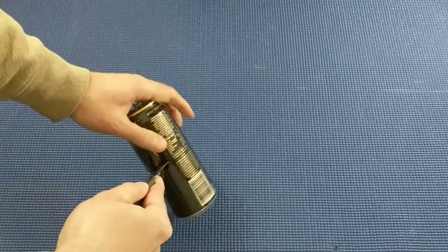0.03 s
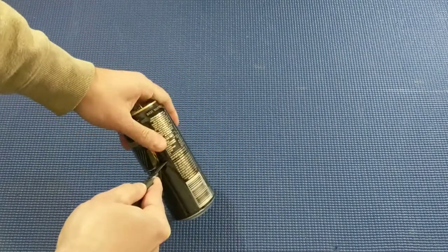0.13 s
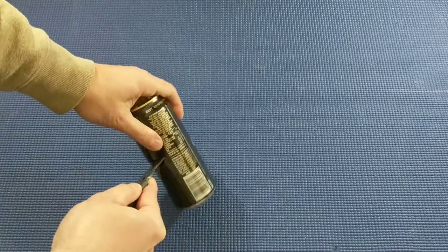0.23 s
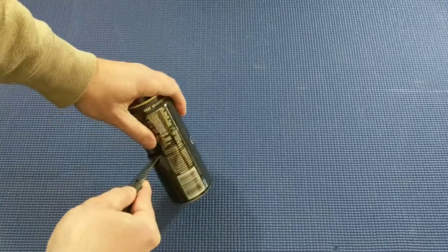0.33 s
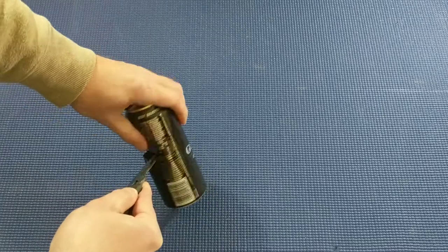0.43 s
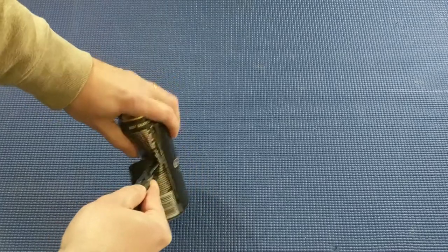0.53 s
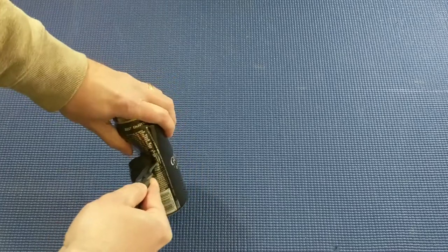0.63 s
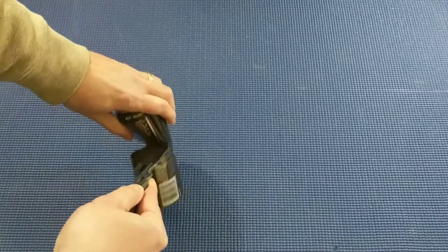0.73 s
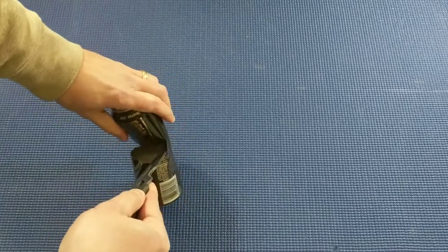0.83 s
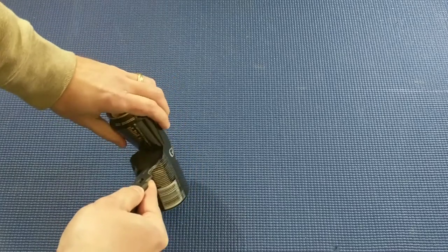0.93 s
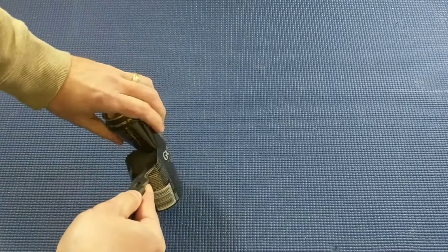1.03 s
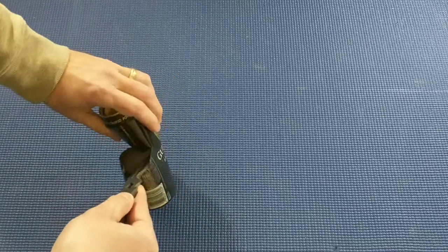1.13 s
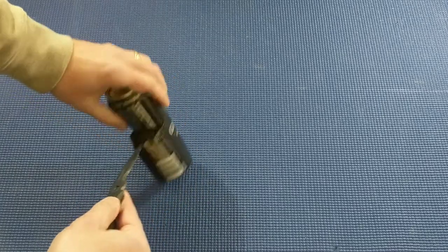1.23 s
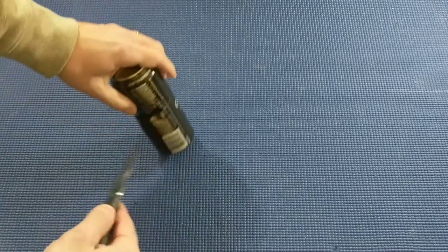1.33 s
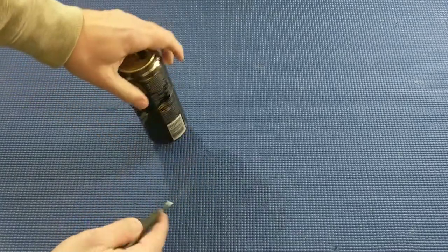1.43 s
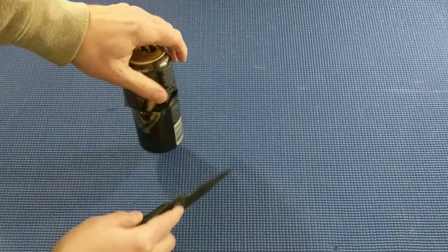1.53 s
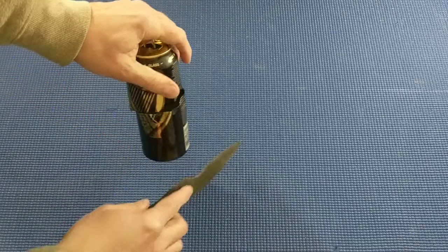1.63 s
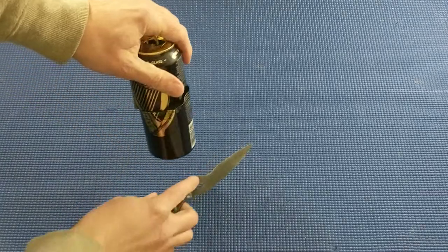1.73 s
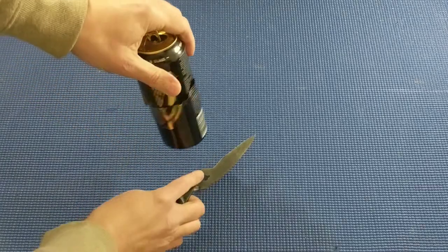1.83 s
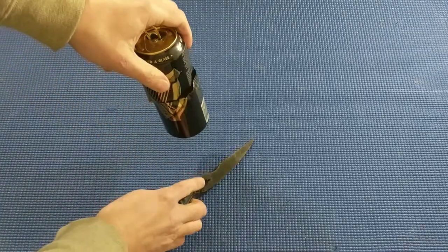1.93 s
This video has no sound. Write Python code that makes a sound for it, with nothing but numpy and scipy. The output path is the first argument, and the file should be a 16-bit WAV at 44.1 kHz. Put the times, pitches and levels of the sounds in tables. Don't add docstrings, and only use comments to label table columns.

```python
import sys
import numpy as np
from scipy import signal
from scipy.fft import rfft, irfft
from scipy.io import wavfile
from scipy.ndimage import uniform_filter1d

SR = 44100
rng = np.random.default_rng(int(sys.argv[2]) if len(sys.argv) > 2 else 0)


def log_audio(samples):
    frames = np.atleast_2d(samples).T
    limited = np.clip(frames, -1, 1)
    pcm = np.round(limited * 32767).astype(np.int16)
    wavfile.write(sys.argv[1], SR, pcm)


def boost(x):
    u = np.asarray(x, float) / 20
    return 10 ** u


N = 85995

# (frequency [Hz], density [dB per Hz])
HUSH_SPECTRUM = [(26, -31), (45, -5.5), (273, -9), (416, -13), (532, -15), (2340, -20.5), (3390, -22),
                 (14600, -36.5), (16500, -32.5)]
HUSH_DB, HUSH_DRIFT_DB = -66.5, 1.66
WHINE_HZ, WHINE_DB = 9250, -89
ROOM_DB, ROOM_T60_S = -9, .11
GRIP_DB, GRIP_FROM_S = -40, 0.59
# (time [s], level [dB], frequency [Hz])
THUMPS = [(.16, -64.5, 75), (.33, -56, 81), (.515, -56, 168), (0.654, -51, 70), (0.774, -46.5, 87.5),
          (.85, -52.5, 79.5), (.978, -54, 161), (1.324, -51, 74.4), (1.424, -56.5, 200.5)]
THUMP_PEAK_S = 0.013
# (time [s], level [dB], frequency [Hz])
LIP_CURVE = [(.04, -72, 1230), (.075, -51, 1230), (.125, -71, 1230), (.83, -77, 1140), (0.867, -31.5, 1123),
             (.885, -39, 1120), (.905, -43, 1144), (.95, -45.5, 1130), (1.0, -41, 1140),
             (1.04, -33.5, 1130), (1.062, -38, 1150), (1.078, -41, 1120), (1.12, -57, 1140),
             (1.16, -43, 1146), (1.21, -65, 1090), (1.272, -31.5, 1130), (1.3, -62, 1152)]
LIP_WIDTH_HZ = 55
# (time [s], peak level [dB], frequency [Hz], t60 [s])
PATCHES = [(0.048, -26.5, 2490, 0.041), (.047, -26.5, 3344, 0.046), (0.064, -32, 3265, 0.038),
           (0.545, -33, 3100, 0.054), (0.623, -20, 2550, 0.034), (0.756, -27, 1470, 0.059),
           (.798, -24, 846, 0.12), (1.092, -36, 1816, 0.052), (1.155, -29.5, 872, 0.056),
           (1.266, -20, 3316, 0.034), (1.271, -16, 2700, 0.029), (1.28, -16.5, 822, 0.073),
           (1.314, -4, 5020, 0.017), (1.316, -18.5, 1782, 0.081), (1.329, -22.5, 814, .04),
           (1.338, -16, 4500, 0.026), (1.4224, -46, 2400, 0.053), (1.4253, -47, 2745, 0.051)]
PATCH_RISE_S = 0.0027
# (time [s], peak level [dB], centre [Hz], ring t60 [s], crack level [dB])
SNAPS = [(0.038, -23, 4620, 0.021, 7.5), (0.2337, -15, 4150, 0.0058, 12.5), (.2652, -6.5, 5200, .04, 6),
         (0.4668, -17.5, 9480, 0.029, 10), (0.5467, -19, 2990, 0.06, 7), (0.583, -19.5, 2980, 0.024, 0),
         (0.7645, -12, 5140, 0.008, 3.5), (0.7858, -11, 4880, 0.0066, 2), (0.9593, -25.5, 2950, 0.095, 4),
         (1.0898, -27.5, 3140, 0.029, 5.5), (1.139, -31, 3250, 0.04, -9), (1.267, -24.5, 2930, 0.076, 7.5),
         (1.314, -22, 5160, 0.05, -11), (1.34, -15, 4590, 0.017, -20), (1.4223, -39.5, 3140, 0.033, 3),
         (1.51, -54, 8410, 0.023, -4)]
# (time [s], peak level [dB], centre [Hz], ring t60 [s], crack level [dB])
BUCKLES = [
    (.2287, -8, 1800, .008, -4),
    (.5455, -15, 1390, .04, -13),
    (.657, -27, 640, .05, -12),
    (.986, -14, 1440, .03, -15),
    (1.090, -26, 1130, .05, -15),
    (1.4235, -30, 670, .14, -18),
    (1.4225, -35, 470, .05, -12),
    (1.4225, -33, 1500, .05, -8),
    (1.772, -49, 1040, .08, -15),
]
POP_OCTAVES, POP_SKIRT_DB, POP_RISE_S = .5, -20, 0.00033
CRACK_WIDTH_RATIO, CRACK_DECAY_S = .85, .003
# (frequency [Hz], level [dB], t60 [s])
PING_MODES = [(1477, -13.5, 0.031), (1758, -7.5, 0.061), (2715, -12.5, 0.059), (3210, -7.5, 0.095)]
PING_S, PING_DB = .2333, -5
# (start [s], length [s], level [dB], fade over the run [dB])
RIPS = [(.2866, .009, -2, -3), (.2965, .017, 0, -6), (.3148, .010, 0, -6), (.3261, .007, -1, -4),
        (.3348, .0045, -2, 3), (.3416, .015, -1, 0), (.3585, .005, -3, 2), (.369, .004, 0, -3)]
SLIPS_PER_S, SLIP_JITTER, SLIP_SPREAD_DB = 712, .04, 2.0
TICK_HZ, TICK_WIDTH_HZ = 3500, 3000
# (frequency [Hz], width [Hz], level [dB])
TEAR_MODES = [(1413, 41, -19.5), (2097, 51, -16), (2820, 58, -10), (3250, 88, -9), (3640, 49, -20),
              (4570, 64, 3.5), (8830, 190, -4.5)]
TEAR_RING_DB, CROWD_DB, CROWD_T60_S = -17, -24, .035
# (time [s], rub level [dB], hollow share [dB], cavity [Hz])
PUSHES = [
    [(0, -59.5, -12, 560), (.033, -66.5, 13, 570), (.04, -31.5, -17, 510), (.063, -31, -10, 524),
     (.1, -83, 18, 595), (.125, -57, -5, 530), (.142, -51, -1, 530), (.2, -71, 7, 617)],
    [(.2, -69, -14, 520), (.214, -37, -12, 495), (.226, -53, -5, 501), (.28, -23.5, -22, 640),
     (.35, -22, -11.5, 657), (.372, -22, -4, 1160), (.4, -52, 10, 1170), (.455, -54, -1, 570)],
    [(.466, -36, -17, 640), (.49, -40, 0, 653), (.508, -44, 4, 626), (.52, -25.5, -3, 820),
     (.54, -39.5, 4, 660), (.585, -27, -3, 607), (.632, -32.5, -12, 630)],
    [(.632, -31.5, -38, 650), (.652, -38.5, -11, 700), (.662, -34.5, -5.5, 676), (.696, -52, 11, 690),
     (.706, -38.5, -19, 696), (.74, -58, 6, 690)],
]
# (time [s], rub level [dB], hollow share [dB], cavity [Hz])
PULLS = [
    [(.74, -58, 4, 660), (.754, -38.5, 6, 674), (.766, -25, -4.5, 713), (.805, -25.5, 3, 827),
     (.826, -37, 4, 770), (.844, -31.5, -7, 754), (.875, -45, -2, 820), (.895, -38.5, -6, 810),
     (.93, -42.5, -3, 780)],
    [(.93, -45, 2, 656), (.99, -28.5, 0.5, 803), (1.04, -36.5, 2, 830), (1.082, -57, 10.5, 850),
     (1.092, -37, 2, 880), (1.125, -75, 13, 850)],
    [(1.125, -66, 13, 885), (1.14, -42, -15, 840), (1.16, -43.5, 8, 808), (1.22, -70.5, 3.5, 890)],
    [(1.225, -52.5, -11, 970), (1.26, -33, -12, 860), (1.27, -24, -9, 847), (1.287, -31, -3, 786),
     (1.3, -28.5, -27, 900), (1.332, -22.5, -0.5, 745), (1.346, -37.5, -7, 774), (1.37, -64, 17, 756),
     (1.415, -72, 11, 705)],
    [(1.424, -50, -3, 676), (1.43, -41, -3, 697), (1.46, -67, 14.5, 640), (1.55, -74.5, -2, 608)],
    [(1.55, -77.5, -3, 606), (1.75, -77.5, 0, 882), (1.78, -74, 6, 1000), (1.94, -73.5, -9, 882)],
]
# (tilt above 2 kHz [dB per octave], shell level [dB])
STROKE_TONES = [(1.5, -6), (-3.5, -2), (-1.5, -0.5), (-5.5, 3.5), (-0.2, -6.5), (-2, 1.5), (-1.5, 2),
                (2.2, -2.5), (-3.5, -19.5), (-3, 5)]
# (frequency [Hz], density [dB per Hz])
RUB_SPECTRUM = [(150, -49.5), (250, -29.5), (809, -29.5), (1020, -8.5), (4350, -2.5), (5190, -7),
                (6290, -8), (15100, -13.5), (16600, -23.5)]
GRITS_PER_S, GRIT_SPREAD_DB, CLUMP_DB = 3500, 2.2, 3.5
CHIRPS_PER_S, CHIRP_DB, CHIRP_T60_S = 1000, -6.5, 0.018
WALL_T60_S, CAVITY_WIDTH_HZ = 0.07, 135
# (frequency [Hz], width [Hz], level [dB])
SHELL_MODES = [(365, 50, -13), (500, 55, -13), (640, 70, -9), (1400, 150, -11)]
SHELL_DB, THIN_HZ = -3.5, 340
DUCK_ABOVE_DB, DUCK_SHARE, RECOVER_DB_PER_S, EDGE_HZ = -30, .3, 35, 16000


def evened(x):
    return x / np.sqrt(np.mean(x ** 2) + 1e-20)


def add(mix, s, sound):
    part = mix[round(s * SR):][:len(sound)]
    part += sound[:len(part)]


def smooth_twice(x, size):
    return uniform_filter1d(uniform_filter1d(x, size), size)


def coloured(x, spectrum):
    f, db = np.transpose(spectrum)
    bins_hz = np.fft.rfftfreq(len(x), 1 / SR)
    gain_db = np.interp(np.log(bins_hz + 1), np.log(f + 1), db)
    return irfft(rfft(x) * boost(gain_db), len(x))


def resonate(x, hz, width_hz):
    turn = np.exp(2j * np.pi * np.cumsum(hz * np.ones(len(x))) / SR)
    r = np.exp(-np.pi * abs(width_hz) / SR)
    return 2 * (turn * signal.lfilter([1 - r], [1, -r], x / turn + 1e-18)).real


def ring(hz, db, t60_s, size=3500):
    t = np.arange(size)[:, None] / SR
    decay = boost(db - 60 * t / np.maximum(t60_s, .004))
    return (decay * np.sin(2 * np.pi * hz * t)).sum(1)


def rise(size, rise_s):
    return 1 - np.exp(-np.arange(size) / SR / rise_s)


def wall_modes(count=70):
    u = rng.random((count, 3))
    return 350 + 15000 * u[:, 0] ** 1.4, -14 * u[:, 1], .5 + u[:, 2]


def air():
    hush = evened(coloured(rng.standard_normal(N), HUSH_SPECTRUM))
    drift = evened(smooth_twice(rng.standard_normal(N), 2500))
    whine = evened(resonate(rng.standard_normal(N), WHINE_HZ, 30))
    return boost(HUSH_DB + HUSH_DRIFT_DB * drift) * hush + boost(WHINE_DB) * whine


def room(x):
    t = np.arange(SR // 3) / SR
    echoes = rng.standard_normal(len(t)) * (rng.random(len(t)) < .08)
    tail = echoes * (t > .003) * boost(-60 * t / ROOM_T60_S)
    return signal.oaconvolve(x, tail / np.linalg.norm(tail))[:N]


def grip(can):
    rumble = evened(resonate(resonate(rng.standard_normal(N), 140, 260), 170, 300))
    power = abs(uniform_filter1d(can ** 2, 1200))
    firmness = np.where(np.arange(N) > GRIP_FROM_S * SR, 1, .45)
    return boost(GRIP_DB) * rumble * np.minimum(power, .001) ** .3 * firmness


def thump(db, hz):
    t = np.arange(6000) / SR
    swell = t / THUMP_PEAK_S * np.exp(1 - t / THUMP_PEAK_S)
    return boost(db) * swell * np.sin(2 * np.pi * hz * t)


def lip():
    s, db, hz = np.transpose(LIP_CURVE)
    t = np.arange(N) / SR
    tone = evened(resonate(rng.standard_normal(N), np.interp(t, s, hz), LIP_WIDTH_HZ))
    return boost(np.interp(t, s, db, -120, -120)) * tone


def patch(db, hz, t60_s):
    pair = ring(hz * np.array([1, 1.035]), np.array([-2, -9]), t60_s)
    return boost(db) * pair * rise(len(pair), PATCH_RISE_S) * 1.5


def pop(db, hz, t60_s, crack_db):
    f, own_db, share = wall_modes()
    f = np.append(f, [hz, 0.65 * hz])
    own_db = np.append(own_db, [0, -5])
    share = np.append(share, [1.2, .8])
    octaves = np.log2(f / hz)
    near_db = POP_SKIRT_DB * (1 - np.exp(-(octaves / POP_OCTAVES) ** 2)) - 6 * np.maximum(octaves, 0)
    body = ring(f, own_db + near_db, t60_s * share)
    body = body * rise(len(body), POP_RISE_S)
    crack = rng.standard_normal(len(body)) * np.exp(-np.arange(len(body)) / SR / CRACK_DECAY_S)
    crack[0] = -5
    width_hz = CRACK_WIDTH_RATIO * hz
    crack = resonate(resonate(crack, hz, width_hz), hz, 2 * width_hz)
    return boost(db) * (body / abs(body).max() + boost(crack_db) * crack / abs(crack).max())


def ping():
    return boost(PING_DB) * ring(*np.transpose(PING_MODES))


def tear():
    slips = np.zeros(N)
    for s, length_s, db, fade_db in RIPS:
        g = rng.standard_normal((40, 2))
        at_s = np.cumsum(np.append(0, (1 + SLIP_JITTER * g[1:, 0]) / SLIPS_PER_S))
        size_db = db + fade_db * at_s / length_s + SLIP_SPREAD_DB * np.clip(g[:, 1], -3, 1)
        slips[np.round((s + at_s) * SR).astype(int)] += boost(size_db) * (at_s <= length_s)
    band = signal.butter(2, [1150, 12500], "band", fs=SR, output="sos")
    slips = signal.sosfilt(band, slips)
    ticks = 9 * resonate(resonate(slips, TICK_HZ, TICK_WIDTH_HZ), TICK_HZ, TICK_WIDTH_HZ)
    f, width_hz, ring_db = np.transpose(TEAR_MODES)
    body = boost(TEAR_RING_DB) * ring(f, ring_db, 1.6 / width_hz)
    f, own_db, share = wall_modes(count=160)
    crowd_db = own_db - 8 * abs(np.log2(f / TICK_HZ))
    crowd = boost(CROWD_DB) * ring(f, crowd_db, CROWD_T60_S * share)
    return ticks - signal.oaconvolve(slips, body + crowd)[:N]


def grit(height, chance, rub):
    height_db = GRIT_SPREAD_DB * np.minimum(-np.log(height + 1e-9), 3)
    catches = boost(height_db) * (chance < GRITS_PER_S / SR) * np.sign(rub)
    return evened(catches) + rub


def chirps(chance, pitch, softness):
    out = np.zeros(len(chance))
    onset = np.minimum(np.arange(900) / 25, 1)
    for i in np.flatnonzero(chance < CHIRPS_PER_S / SR):
        add(out, i / SR, ring(900 * 11 ** pitch[i], -15 * softness[i], CHIRP_T60_S, size=900) * onset)
    return out


def scraped_wall(drive, chirping, tilt_db):
    f, db, share = wall_modes()
    rung = signal.oaconvolve(drive, ring(f, db, WALL_T60_S * share))[:len(drive)]
    raw = .4 * evened(rung) + evened(drive) + boost(CHIRP_DB) * evened(chirping)
    tilted = [(f, d + tilt_db * max(np.log2(f / 2000), 0)) for f, d in RUB_SPECTRUM]
    return evened(coloured(raw, tilted))


def cavity(low, drive, hz):
    hum = evened(resonate(resonate(low, hz, CAVITY_WIDTH_HZ), hz, 3 * CAVITY_WIDTH_HZ))
    return hum + 0.091 * evened(resonate(drive, 1.3 * hz, 0.5 * CAVITY_WIDTH_HZ))


def stroke(rows, tilt_db, shell_db):
    s, rub_db, hollow_db, hz = np.transpose(rows)
    t = np.arange(s[0], s[-1], 1 / SR)
    height, catch, chirp, pitch, softness = rng.random((N // 5, 5))[:len(t)].T
    clumping, rub, rumble = rng.standard_normal((N // 5, 3))[:len(t)].T
    clump = boost(CLUMP_DB * evened(smooth_twice(clumping, 200)))
    drive = clump * grit(height, catch, rub)
    wall = scraped_wall(drive, chirps(chirp, pitch, softness), tilt_db)
    nearest_row = np.searchsorted((s[1:] + s[:-1]) / 2, t)
    low = clump * rumble + 2.0 * drive
    hum = cavity(low, drive, uniform_filter1d(hz[nearest_row], 300))
    shell = evened(sum(boost(d) * evened(resonate(low, f, width_hz)) for f, width_hz, d in SHELL_MODES))
    hollow = boost(np.interp(t, s, hollow_db))
    body = hollow * hum + boost(SHELL_DB + shell_db) * np.sqrt(hollow) * shell
    return boost(np.interp(t, s, rub_db)) * (wall + body)


def scene():
    can = tear()
    for rows, tone in zip(PUSHES + PULLS, STROKE_TONES):
        add(can, rows[0][0], stroke(rows, *tone))
    for s, *settings in PATCHES:
        add(can, s, patch(*settings))
    can = can + lip()
    for s, *settings in SNAPS + BUCKLES:
        add(can, s, pop(*settings))
    add(can, PING_S, ping())
    can = signal.sosfilt(signal.butter(5, THIN_HZ, "high", fs=SR, output="sos"), can)
    for s, db, hz in THUMPS:
        add(can, s, thump(db, hz))
    return (can + boost(ROOM_DB) * room(can) + grip(can) + air())[None]


def low_pass(x):
    return signal.sosfilt(signal.butter(12, 17000, fs=SR, output="sos"), x)


def record(dry):
    power_db = 10 * np.log10(abs(uniform_filter1d(dry[0] ** 2, 1500)) + 1e-12)
    fall_db = np.arange(N) * RECOVER_DB_PER_S / SR
    held_db = np.maximum.accumulate(power_db + fall_db) - fall_db
    over_db = np.maximum(held_db - DUCK_ABOVE_DB, 0)
    ducked = dry * boost(-DUCK_SHARE * uniform_filter1d(over_db, 400))
    band = signal.firwin(255, EDGE_HZ, window=("kaiser", 4), fs=SR)
    return low_pass(signal.oaconvolve(ducked, band[None], "same"))


dry = scene()
out = record(dry)
log_audio(out)
```